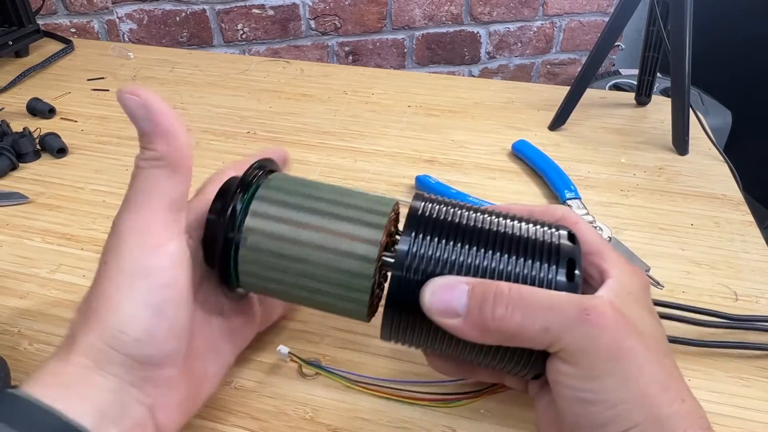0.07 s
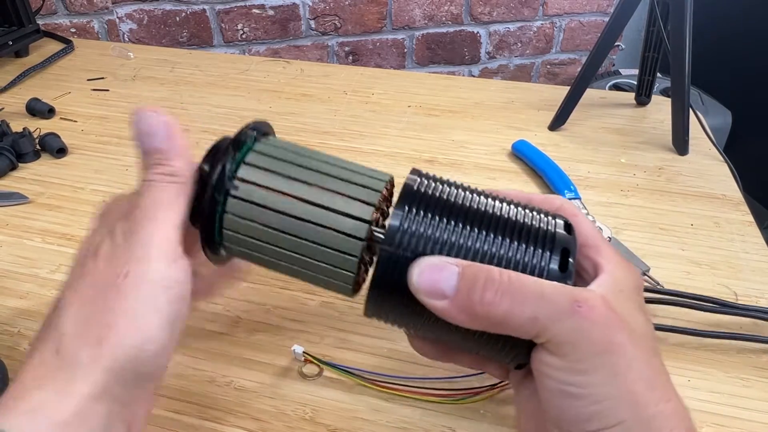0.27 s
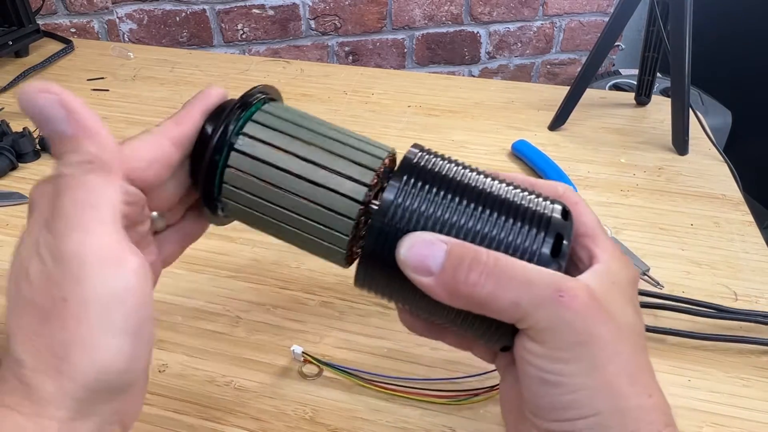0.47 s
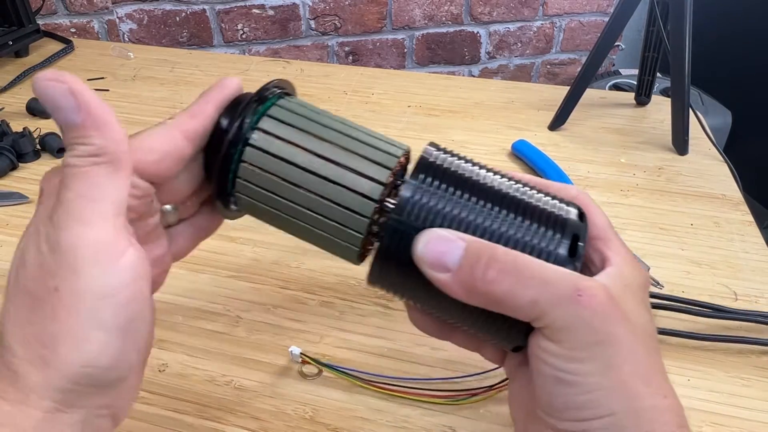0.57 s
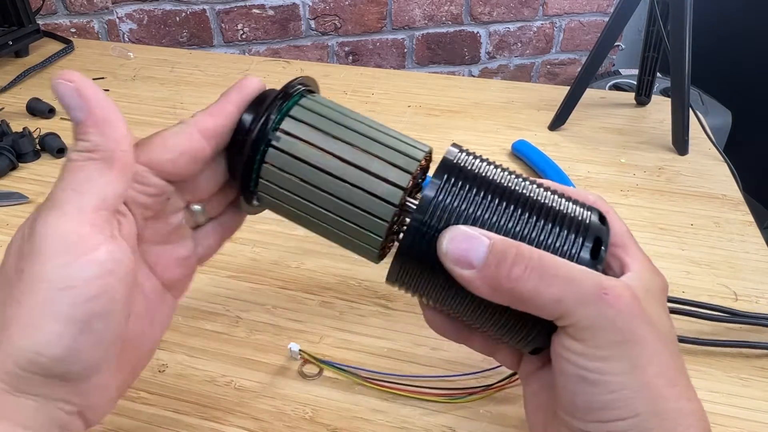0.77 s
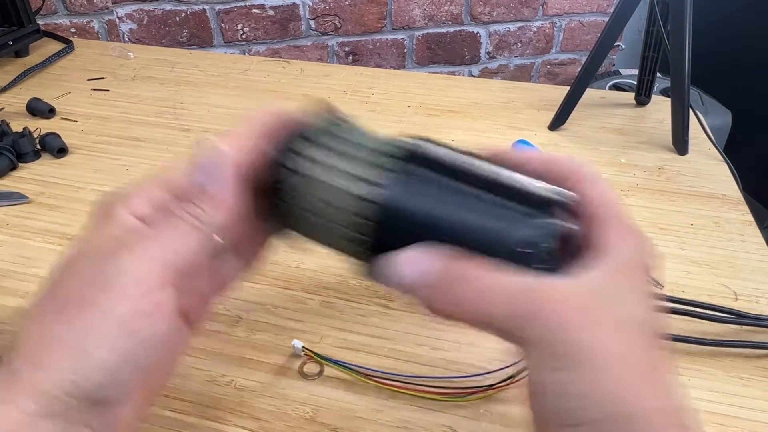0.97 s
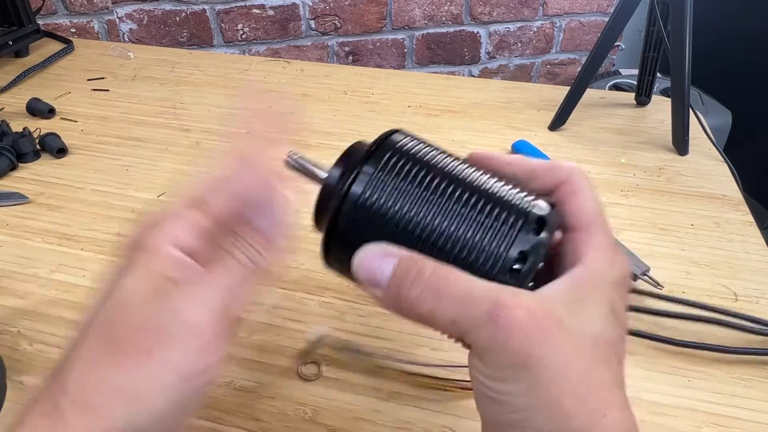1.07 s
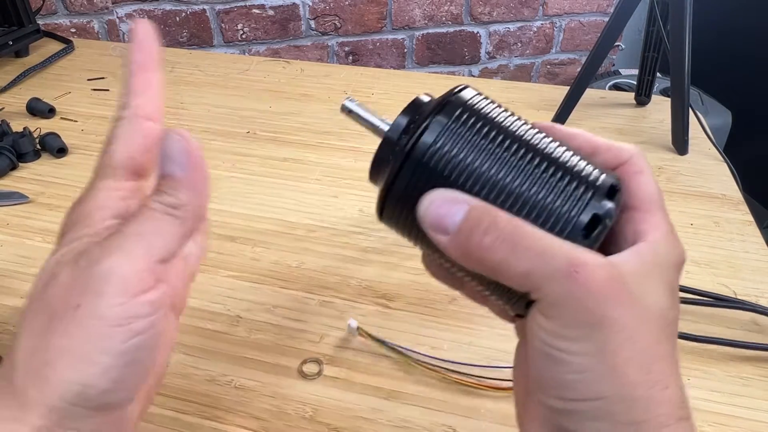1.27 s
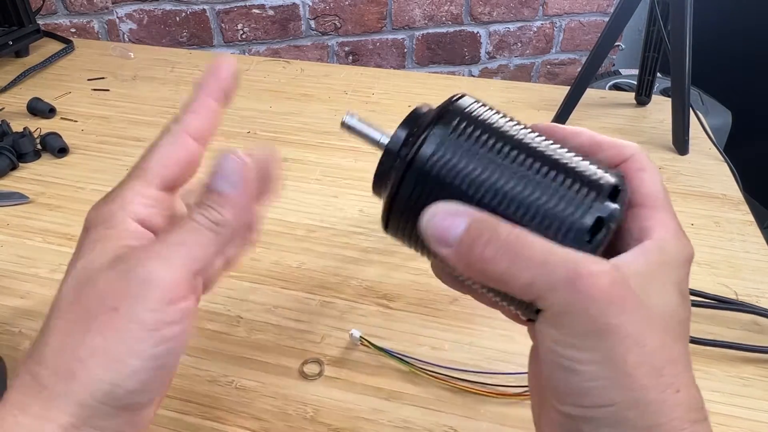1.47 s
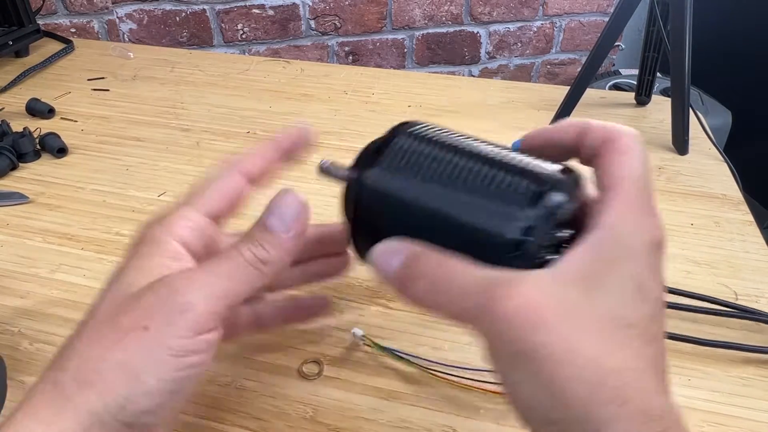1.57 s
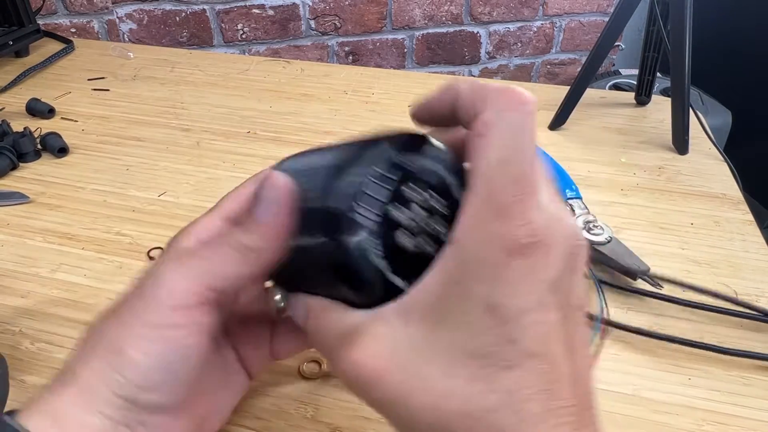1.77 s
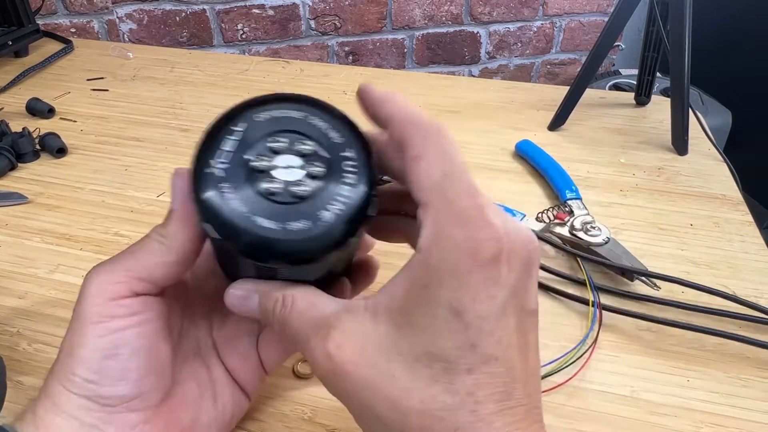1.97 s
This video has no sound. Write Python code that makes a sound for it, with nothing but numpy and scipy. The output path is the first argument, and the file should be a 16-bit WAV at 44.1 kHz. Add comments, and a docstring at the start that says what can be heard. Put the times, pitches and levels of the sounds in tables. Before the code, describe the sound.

A motor core snaps into its metal housing with one hard, loud clack and brief high ring

```python
"""A low wavering hum, a deep rumble and hands rubbing a motor are heard first, then small ticks and dull knocks.
Magnets then pull the stator into its metal housing: a light first touch, a hard clack and one rebound.
Friction is roughened noise, contacts are noise bursts and decaying modes, and the hum is a sum of sines.
The workshop answers by convolution with decaying noise, and the close microphone overloads."""
import sys
import numpy as np
from scipy import signal
from scipy.fft import rfft, irfft
from scipy.io import wavfile

SR = 44100
rng = np.random.default_rng(int(sys.argv[2]) if len(sys.argv) > 2 else 0)


def file_out(sig):
    """Save sig as 16-bit WAV at sys.argv[1]."""
    # one column per channel
    cols = np.atleast_2d(sig).T
    # limit, then scale
    lim = np.clip(cols, -1, 1)
    pcm = np.round(lim * 32767).astype(np.int16)
    wavfile.write(sys.argv[1], SR, pcm)


N = 88332
TIME = np.arange(N) / SR  # s

# Source levels are those ahead of the input drive; noise colours are relative, since the noise is normalised.
# Machine hum. Each row: frequency in Hz, level in dB rms before its waver.
HUM_PARTIALS = [(29.6, -35), (59.1, -37), (88.7, -43.5), (119.8, -41)]
HUM_WAVER_DB, HUM_WAVERS_PER_S = 0.6, 4
# Colour of the room noise. Each row: frequency in Hz, relative level in dB per Hz.
AIR_COLOUR = [(20, -7), (45, -12.5), (110, -2), (200, -13.5), (400, -27.5), (1000, -41.5), (3000, -49),
              (8000, -60), (16000, -72)]
AIR_DB = -46.5  # rms
# Low rumble, swelling round the snap. Each row: time in seconds, level in dB.
RUMBLE_LEVELS = [(0, -38), (.35, -57), (.6, -38), (.95, -33.5), (1.05, -31.5), (1.2, -29), (1.4, -36),
                 (2, -51)]
RUMBLE_LOW_HZ, RUMBLE_HIGH_HZ = 18, 35.4

# Skin sliding on metal. Each row: time in seconds, dull body in dB, dry hiss in dB, both before roughening.
RUB_LEVELS = [(0, -54.5, -63.5), (.16, -67.5, -66), (.22, -62, -66.5), (.28, -62.5, -73.5),
              (.53, -63.5, -76), (.62, -58.5, -65.5), (.67, -55, -68), (.75, -48.5, -59.5), (.83, -61, -78),
              (.95, -60, -73), (1.3, -61, -67.5), (1.5, -55, -59.5), (1.62, -56.5, -57.5),
              (1.78, -53, -53.5), (1.88, -49.5, -55.5), (2, -57.5, -65)]
# Colours of the dull body and of the dry hiss. Each row: frequency in Hz, relative level in dB per Hz.
RUB_BODY_COLOUR = [(100, -7), (210, 5), (310, 0), (410, 7), (520, -0.5), (700, -1.5), (1200, -20.5),
                   (3000, -40.5)]
RUB_HISS_COLOUR = [(400, -12.5), (1000, 6.5), (1700, 3), (3000, -6.5), (6000, -19), (14000, -36)]
RUB_GRAINS_PER_S, RUB_ROUGH_DB = 220, 2.6

# Small sharp ticks of handling. Each row: start in seconds, peak level in dB, pitch in Hz.
TICK_EVENTS = [(0.039, -56, 1630), (0.062, -56, 1700), (0.089, -51.5, 1930), (0.123, -50.5, 4240),
               (0.201, -49, 1440), (.599, -55, 2410), (0.702, -50.5, 2150), (.731, -50, 2200),
               (0.765, -52, 2200), (1.4703, -32.5, 1720), (1.563, -48, 2300)]
TICK_SPREAD = 1.91  # frequency ratio from the pitch to either band edge
TICK_RATTLE_DB, TICK_T60_S = -21, 0.013

# Fingers knocking on the housing. Each row: start in seconds, gain in dB, upper band limit in Hz.
KNOCK_EVENTS = [(0.153, -48, 2500), (.599, -54, 2460), (.693, -42, 590), (0.729, -52, 1980),
                (.909, -47.5, 1300), (1.469, -38.5, 1430), (1.805, -32, 646), (1.8444, -27.5, 1536)]
# Modes of the motor, damped by the hands. Each row: frequency in Hz, level in dB, t60 in seconds.
THUD_MODES = [(229, -12.5, 0.067), (354, -11, 0.041), (495, -9, 0.034), (650, -6.5, 0.063), (885, 1, 0.014),
              (1120, -3, .02), (1560, -4, 0.015)]
SCUFF_DB, SCUFF_T60_S = -9, 0.05
RADIATION_HZ = 260  # a small body radiates little below this

# Colour of the first light touch. Each row: frequency in Hz, relative level in dB per Hz.
GRAZE_COLOUR = [(200, -13), (1500, -8), (3000, -9), (5000, -2.5), (8000, -5.5), (12500, -15), (15200, 4.5),
                (16000, -9.5)]
# Soft thump of that touch. Each row: frequency in Hz, level in dB, t60 in seconds.
GRAZE_THUMP = [(520, -27.5, .08)]
GRAZE_S, GRAZE_DB, GRAZE_T60_S, GRAZE_RING_DB = 0.9818, -25.5, 0.035, -39

# The stator strikes home and rebounds. Each row: start in seconds, clack, ring and crack gains in dB.
BLOWS = [(1.0059, -3, -0.5, 5.5), (1.0214, -8, -2.5, -5.5)]
# Modes of the heavy stator and end cap, the strong ones dead.
# Each row: frequency in Hz, level in dB, t60 in seconds.
CLACK_MODES = [(356, -20.5, .04), (734, -12.5, 0.014), (1070, -13.5, 0.011), (1259, 7, .018),
               (1414.6, 11, 0.011), (1750, -3, 0.012), (2496, -4, 0.015), (2730, -10.5, 0.013),
               (1177, -29.5, 0.76), (1305, -27.5, 0.4), (1435, -29.5, 0.36)]
# Ringing modes of the housing. Each row: frequency in Hz, level in dB, t60 in seconds.
RING_MODES = [ (3706, 10.5, 0.046), (3670, -18.5, .38), (3610, -25.5, 0.46), (3735, -19, 0.35),
              (3600, -23, 0.26), (3954, -11.5, .03), (15060, -25, .23), (15170, -28, .15), ]
RING_RISE_S = 0.0016  # the housing takes a moment to start ringing
# Colour of the crack of metal on metal. Each row: frequency in Hz, relative level in dB per Hz.
CRACK_COLOUR = [(150, -17.5), (1200, 2.5), (2200, -2), (3200, 6), (5000, 1), (8000, -8), (12500, -18),
                (14500, -10), (15200, 0), (16000, -13)]
CRACK_DB, CRACK_T60_S = -5, 0.028

# Reverberation of the workshop. Each row: frequency in Hz, gain in dB, t60 in seconds.
ROOM_BANDS = [(100, -21.5, 0.22), (400, -18, 0.67), (1300, -11.5, .45), (2400, -9, 0.56), (3696, -12.5, .5),
              (5500, -8, .52), (8000, -12.5, 0.36), (12000, -18, 0.39), (15500, -14.5, .28)]
ROOM_DELAY_S = 0.0091
# Scatter from the bench and the near wall.
EARLY_DB, EARLY_T60_S, EARLY_LOW_HZ, EARLY_HIGH_HZ = -9.5, 0.11, 430, 14800
# How much of each reaches the room, relative to the other contacts.
CLACK_ROOM_DB, RING_ROOM_DB = -4.5, -7

DRIVE_DB, CLIP_HARDNESS = -1.5, 4.4
CUTOFF_HZ, FADE_S = 16000, 0.006


def amp(db):
    """Logarithmic level: 20 dB is a tenfold amplitude ratio."""
    return 10 ** (np.asarray(db) / 20)


def rms_one(x):
    """Normalisation by mean power: the rms becomes 1."""
    return x / np.sqrt(np.mean(x ** 2) + 1e-20)


def at_hz(rows, hz, axis=1):
    """Interpolation of a table column on a log-frequency axis."""
    rows = np.array(rows)
    return np.interp(np.log(np.maximum(hz, 1)), np.log(rows[:, 0]), rows[:, axis])


def noise(colour):
    """Spectral shaping: white noise is weighted by a colour table and brought to rms 1."""
    hz = np.fft.rfftfreq(N, 1 / SR)
    spectrum = rfft(rng.standard_normal(N)) * amp(at_hz(colour, hz))
    return rms_one(irfft(spectrum, N))


def drift(rate):
    """Random modulation: normal values, rate per second, joined by straight lines."""
    return np.interp(TIME * rate, np.arange(N), rng.standard_normal(N))


def decay(start, t60):
    """Exponential decay: a jump to 1 at start, then a fall of 60 dB in each t60."""
    return (TIME >= start) * amp(-60 * np.clip((TIME - start) / t60, 0, 5))


def band(x, low_hz, high_hz, order=2):
    """Causal band-pass filtering with a Butterworth response."""
    return signal.sosfilt(signal.butter(order, [low_hz, high_hz], "band", fs=SR, output="sos"), x)


def struck(modes, start):
    """Modal superposition: one blow sets off a sum of decaying sines."""
    out = 0
    for hz, db, t60 in modes:
        out = out + amp(db) * decay(start, t60) * np.sin(2 * np.pi * hz * (TIME - start))
    return out


def background():
    """Additive synthesis: slightly wavering hum partials lie over dull broadband room noise."""
    hum = 0
    for hz, db in HUM_PARTIALS:
        level = amp(db + HUM_WAVER_DB * drift(HUM_WAVERS_PER_S))
        hum = hum + level * np.sin(2 * np.pi * (hz * TIME + rng.random()))
    return np.sqrt(2) * hum + amp(AIR_DB) * noise(AIR_COLOUR)  # sqrt(2) turns rms into peak


def rumble():
    """Narrow-band noise: its random beating makes a deep unsteady rumble that swells round the snap."""
    deep = rms_one(band(rng.standard_normal(N), RUMBLE_LOW_HZ, RUMBLE_HIGH_HZ))
    return amp(np.interp(TIME, *np.transpose(RUMBLE_LEVELS))) * deep


def rub():
    """Grainy friction: one random modulation makes the dull body and dry hiss of sliding skin catch together."""
    s, body_db, hiss_db = np.transpose(RUB_LEVELS)
    body = noise(RUB_BODY_COLOUR) * amp(np.interp(TIME, s, body_db))
    hiss = noise(RUB_HISS_COLOUR) * amp(np.interp(TIME, s, hiss_db))
    return (body + hiss) * amp(RUB_ROUGH_DB * drift(RUB_GRAINS_PER_S))


def ticks():
    """Impulse excitation: a tiny dry contact is a click and faint scuff in a broad band round its pitch."""
    out = 0
    for s, db, hz in TICK_EVENTS:
        click = signal.unit_impulse(N, int(s * SR))
        scuff = amp(TICK_RATTLE_DB) * rng.standard_normal(N) * decay(s, TICK_T60_S)
        tick = band(click + scuff, hz / TICK_SPREAD, hz * TICK_SPREAD, order=4)
        out = out + amp(db) * tick / np.abs(tick).max()
    return out


def knocks():
    """Damped modal response: soft finger blows give a thud and a scuff, each under its own upper limit."""
    out = 0
    for s, db, bright_hz in KNOCK_EVENTS:
        scuff = amp(SCUFF_DB) * rng.standard_normal(N) * decay(s, SCUFF_T60_S)
        thud = struck(THUD_MODES, s) + scuff
        out = out + amp(db) * band(thud, RADIATION_HZ / 2, bright_hz)
    return out


def graze():
    """Weak excitation: a light touch gives a short bright scrape and soft thump and barely wakes the ring."""
    scrape = amp(GRAZE_DB) * noise(GRAZE_COLOUR) * decay(GRAZE_S, GRAZE_T60_S)
    thump = struck(GRAZE_THUMP, GRAZE_S)
    ring = amp(GRAZE_RING_DB) * struck(RING_MODES, GRAZE_S)
    return scrape + thump + ring


def snap():
    """Impact of two bodies: each blow gives a dead clack, a high ring and a short crack, as three layers."""
    hiss = amp(CRACK_DB) * noise(CRACK_COLOUR)
    clack, ring, crack = 0, 0, 0
    for s, clack_db, ring_db, crack_db in BLOWS:
        rise = np.clip((TIME - s) / RING_RISE_S, 0, 1) ** 2
        clack = clack - amp(clack_db) * struck(CLACK_MODES, s)  # opposite polarity to the ring
        ring = ring + amp(ring_db) * rise * struck(RING_MODES, s)
        crack = crack + amp(crack_db) * rise * hiss * decay(s, CRACK_T60_S)
    radiation = signal.butter(2, RADIATION_HZ, "high", fs=SR, output="sos")
    return signal.sosfilt(radiation, [clack, ring, crack])


def workshop(x):
    """Reverberation by convolution: quick near scatter, then a diffuse tail that dies band by band."""
    early = band(rng.standard_normal(N) * decay(ROOM_DELAY_S, EARLY_T60_S), EARLY_LOW_HZ, EARLY_HIGH_HZ)
    response = amp(EARLY_DB) * rms_one(early) / np.sqrt(N)  # energy set by the level alone
    edges = np.geomspace(80, 18000, 15)  # Hz
    for low, high in zip(edges, edges[1:]):
        hz = np.sqrt(low * high)
        t60 = at_hz(ROOM_BANDS, hz, axis=2)
        tail = band(rng.standard_normal(N) * decay(ROOM_DELAY_S, t60), low, high)
        share = np.sqrt(2 * (high - low) / SR / N)  # energy in proportion to bandwidth
        response = response + amp(at_hz(ROOM_BANDS, hz)) * rms_one(tail) * share
    return signal.fftconvolve(x, response)[:N]


def scene():
    """Superposition of direct sound, room response and background in one channel."""
    clack, ring, crack = snap()
    contacts = rub() + ticks() + knocks() + graze() + crack
    room = workshop(contacts + amp(CLACK_ROOM_DB) * clack + amp(RING_ROOM_DB) * ring)
    return (background() + rumble() + contacts + clack + ring + room)[None]


def record(dry):
    """Saturation: the input bends peaks towards full scale; the top is cut and the ends are eased."""
    edge = np.clip(np.minimum(TIME, TIME[::-1]) / FADE_S, 0, 1)
    ease = np.sin(np.pi / 2 * edge) ** 2
    x = signal.resample_poly(dry * ease * amp(DRIVE_DB), 4, 1, axis=1)  # oversampling limits aliasing
    x = x / (1 + np.abs(x) ** CLIP_HARDNESS) ** (1 / CLIP_HARDNESS)
    x = signal.resample_poly(x, 1, 4, axis=1)
    lowpass = signal.firwin(101, CUTOFF_HZ, fs=SR)
    return signal.fftconvolve(x, lowpass[None], "same", axes=1)


dry = scene()
out = record(dry)
file_out(out)
```